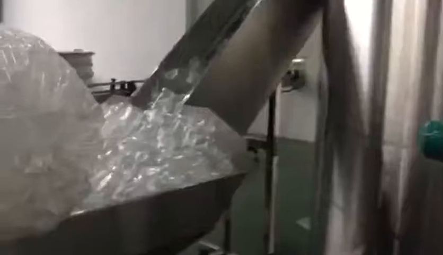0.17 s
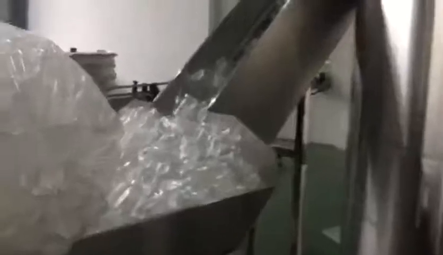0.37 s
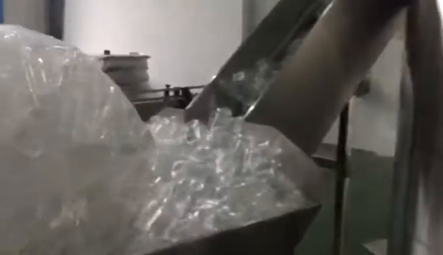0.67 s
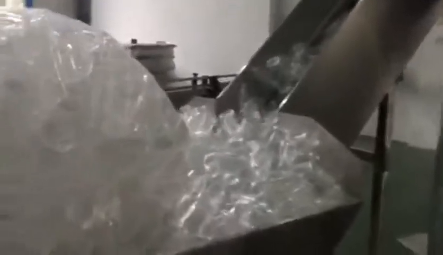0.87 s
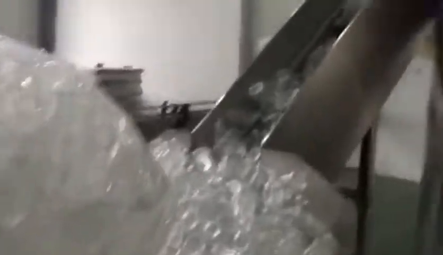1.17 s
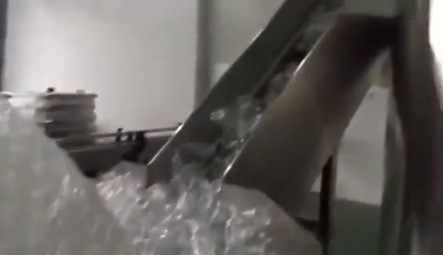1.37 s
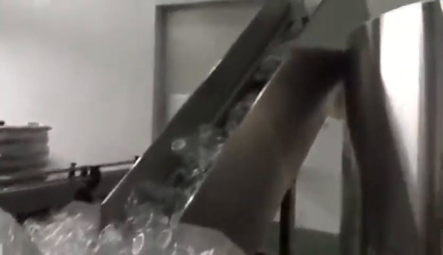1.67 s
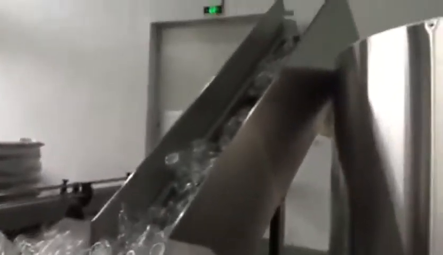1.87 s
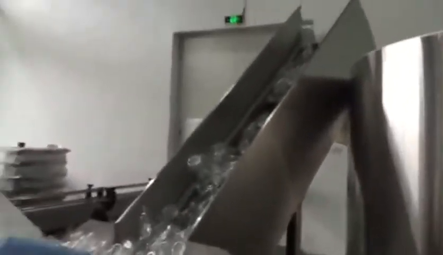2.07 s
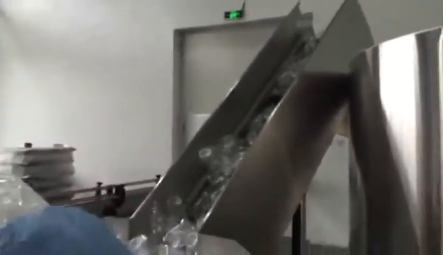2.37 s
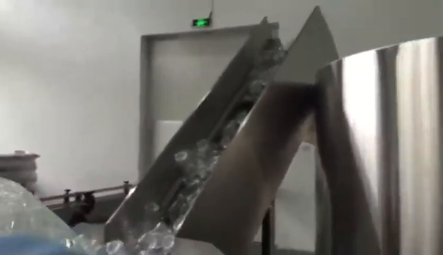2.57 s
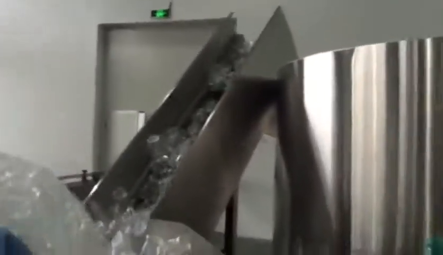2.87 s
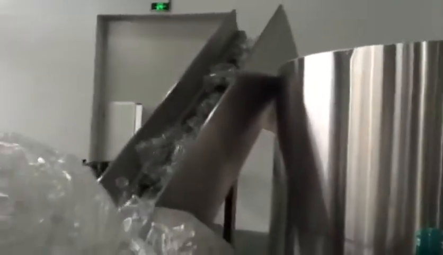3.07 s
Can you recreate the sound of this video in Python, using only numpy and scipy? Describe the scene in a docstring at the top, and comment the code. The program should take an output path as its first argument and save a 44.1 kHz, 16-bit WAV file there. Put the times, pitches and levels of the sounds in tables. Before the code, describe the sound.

Empty plastic bottles clatter into a steel drum from the start, clacking close by and thudding on its wall, over motor hum, rumble and compressed air hiss in a hard-walled factory room. From about 1 second the steel rings louder. Two soft bass bumps pass near 1.8 seconds, air rushes out briefly at 1.9 and 2.3, and the bottles keep tumbling until the end, just past 3 seconds.

```python
"""A bottle sorting machine in a hard-walled factory room, heard through one moving microphone.
The microphone opens at 0.1 s on the hum and rumble of the drive and the hiss of compressed air.
At once a conveyor is tipping empty plastic bottles into a steel drum: they clatter, clack close by
and boom on its wall. From about 1 s the steel rings louder. Two soft bass bumps pass near 1.8 s,
air rushes out at 1.9 and 2.3 s, and the bottles tumble on to the end."""
import sys
import numpy as np
from scipy import signal
from scipy.fft import rfft, irfft
from scipy.io import wavfile

SR = 44100
rng = np.random.default_rng(int(sys.argv[2]) if len(sys.argv) > 2 else 0)


def wrap_up_sound(samples):
    """Save the sound to the file named by the first command line argument, as 16-bit audio."""
    columns = np.atleast_2d(samples).T
    # keep every value between -1 and 1, then stretch to whole-number steps
    tamed = np.clip(columns, -1, 1)
    steps = np.round(tamed * 32767).astype(np.int16)
    wavfile.write(sys.argv[1], SR, steps)


N = 141561


def amp(db):
    """Decibels to gain."""
    return 10 ** (np.asarray(db) / 20)


def unit_rms(x):
    """Scales to rms 1."""
    return x / np.sqrt(np.mean(x ** 2) + 1e-20)


def unit_energy(x):
    """Scales to energy 1."""
    return x / (np.linalg.norm(x) + 1e-20)


def at_hz(points, hz):
    """Reads a spectrum on a log-frequency axis."""
    freq_hz, value = np.transpose(points)
    return np.interp(np.log(hz + 1), np.log(freq_hz + 1), value)


def level(points):
    """Gain per sample from rows of time_s, level_db."""
    return amp(np.interp(np.arange(N) / SR, *np.transpose(points)))


def add(mix, start_s, sound):
    """Mixes a sound in at a time."""
    part = mix[max(round(start_s * SR), 0):][:len(sound)]
    part += sound[:len(part)]


def through(x, response):
    """Convolves and cuts to length."""
    return signal.fftconvolve(x, response)[:N]


def colour(points, size=4096):
    """Minimum-phase response of energy 1 with the given spectral shape."""
    log_gain = np.log(amp(at_hz(points, abs(np.fft.fftfreq(size, 1 / SR)))))
    spectrum = np.exp(np.conj(signal.hilbert(log_gain)))
    return unit_energy(np.fft.ifft(spectrum).real[:size // 2])


def noise(points):
    """Noise of rms 1 with the given spectral shape."""
    return unit_rms(through(rng.standard_normal(N), colour(points)))


def drift(rate_hz):
    """Slow random motion of rms 1."""
    hz = np.fft.rfftfreq(N, 1 / SR)
    return unit_rms(irfft(rfft(rng.standard_normal(N)) / (1 + (hz / rate_hz) ** 2), N))


def impacts(per_s, spread_db):
    """Random clicks, many small and a few large."""
    size = amp(spread_db * np.minimum(rng.exponential(1, N), 4)) * rng.choice([-1, 1], N)
    return size * (rng.random(N) < per_s / SR)


def blows(rows, rise_s, decay_s):
    """Each blow is several bottles at once: a burst of contacts that swells and dies."""
    out, t = np.zeros(N), np.arange(SR // 8) / SR
    for start_s, db in rows:
        contacts = rng.standard_normal(len(t)) * (1 - np.exp(-t / rise_s)) * np.exp(-t / decay_s)
        add(out, start_s, amp(db) * np.sqrt(0.027 * SR) * unit_energy(contacts))  # energy of 27 ms at db
    return out


# reverberation of the hard walls around the microphone: freq_hz, t60_s
ROOM_DECAY = [(125, 0.89), (1000, 0.81), (4000, 0.42), (12000, 0.21)]

def room(direct, wet_db, spots=6):
    """Direct sound plus a diffuse tail whose treble dies first; echoes change as the microphone moves."""
    wet, position = np.zeros(N), np.linspace(0, spots - 1, N)
    for spot in range(spots):
        hz, t, spectra = signal.stft(rng.standard_normal(SR // 2), SR, nperseg=256)
        decay = amp(-60 * t / at_hz(ROOM_DECAY, hz)[:, None])
        tail = signal.istft(spectra * decay, SR)[1]
        tail[:SR // 250] = 0  # the first echo arrives after 4 ms
        crossfade = np.cos(np.pi / 2 * np.minimum(abs(position - spot), 1))
        wet += through(direct * crossfade, unit_energy(tail))
    return (direct + amp(wet_db) * wet) / np.hypot(1, amp(wet_db))


# the drive's rumble, under everything at the microphone: time_s, level_db
RUMBLE_LEVEL = [(.12, -23.5), (.9, -21), (1.4, -21.5), (2.5, -24), (3.21, -21)]
# colour of that rumble: freq_hz, density_db
RUMBLE_SPECTRUM = [(20, -14), (35, -48), (50, -9.5), (100, -4.5), (170, 0.5), (290, 0.5), (450, -5.5),
                   (700, -10), (1500, -15.5), (5000, -22.5)]
# tones of the drive: pitch_hz, level_db
HUM_TONES = [(220.7, -39.5), (245.5, -35.5), (693.5, -39), (1416, -45.5), (2123, -51), (3278, -43)]

def drive():
    """Motors and conveyor: a fluttering rumble and slightly wavering tones."""
    out = level(RUMBLE_LEVEL) * noise(RUMBLE_SPECTRUM) * amp(1.12 * drift(rate_hz=20))
    for hz, db in HUM_TONES:
        cycles = np.cumsum(hz * (1 + 0.00318 * drift(rate_hz=5.07))) / SR
        out += amp(db + 3.7 * drift(rate_hz=1.1)) * np.sqrt(2) * np.sin(2 * np.pi * cycles)
    return out


# the machine's compressed air, at the microphone: time_s, level_db
HISS_LEVEL = [(.12, -18.5), (.5, -21), (.64, -21.5), (.9, -24.5), (1.12, -22), (1.3, -22.5), (1.5, -21.5),
              (1.7, -23.5), (1.8, -21.5), (1.9, -23), (2.02, -20), (2.16, -22), (2.41, -23.5), (2.8, -24.5),
              (2.95, -24), (3.21, -23)]
# colour of escaping air: freq_hz, density_db
AIR_SPECTRUM = [(1000, -28), (3000, 7), (6500, 7), (7700, 2), (9700, 1), (10450, -6.5), (10900, -1.5),
                (11500, -5.5)]

def air_hiss():
    """Compressed air hisses and flutters."""
    return level(HISS_LEVEL) * amp(1.9 * drift(rate_hz=17)) * noise(AIR_SPECTRUM)


def flurries(per_s=22, decay_s=0.01):
    """Gain of the clatter: each falling bottle sets off a short flurry of taps."""
    gain, t = np.ones(N), np.arange(SR // 8) / SR
    for slot_s in np.arange(0, N / SR, 1 / per_s):
        add(gain, slot_s + rng.random() / per_s, np.exp(-t / decay_s))
    return gain


# bright clatter of the heap in the drum, with the room around it: time_s, level_db
CLATTER_LEVEL = [(0.12,-23), (0.18,-18.5), (.44,-18.5), (.56,-22), (0.72,-20.5), (0.78,-20), (0.93,-23.5),
                 (1.0,-20.5), (1.2,-20.5), (1.34,-20.5), (1.47,-24.5), (1.57,-19), (1.62,-25.5),
                 (1.86,-20.5), (2.06,-20), (2.17,-25.5), (2.3,-19.5), (2.54,-25.5), (2.66,-23.5),
                 (2.74,-33), (2.79,-20.5), (2.9,-26), (2.97,-22.5), (3.21,-21.5)]
# colour of the empty plastic bottles: freq_hz, density_db
PLASTIC_SPECTRUM = [(30, -31), (200, -11), (800, -4), (1550, -1), (2050, 3.5), (2850, 1), (4500, -0.5),
                    (4900, -8), (5500, -6.5), (6800, -18), (7700, -23), (11500, -25.5)]

def bottle_clatter(count=300, modes=24):
    """Thin plastic shells tap each other; each rings briefly with its own modes."""
    taps, t = np.zeros(N), np.arange(SR // 60) / SR
    mode_hz = rng.uniform(300, 12000, size=(count, modes, 1))
    t60_s = 0.022 * np.sqrt(3000 / mode_hz)
    shells = (np.cos(2 * np.pi * mode_hz * t) * amp(-60 * t / t60_s)).sum(1)
    clicks = impacts(per_s=1400, spread_db=3)
    struck = rng.integers(0, count, N)
    for i in np.flatnonzero(clicks):
        add(taps, i / SR, clicks[i] * shells[struck[i]])
    heap = unit_rms(through(taps * flurries(), colour(PLASTIC_SPECTRUM)))
    return room(heap, wet_db=-4) * level(CLATTER_LEVEL)


# bottles colliding close to the microphone: start_s, relative_db
CLOSE_CLACKS = [(.112, -19), (.21, -16.5), (.335, -19), (.408, -15.5), (.634, -18), (.755, -15.5),
                (.8, -18), (1.042, -18.5), (1.112, -19.5), (1.321, -14), (1.669, -19), (1.925, -18.5),
                (1.99, -20), (2.277, -20), (2.638, -19), (3.094, -21), (3.14, -23)]

def bottle_clacks(tilt_db_per_octave=0.5):
    """Nearby bottles clack sharply against each other, brighter than the heap."""
    bright = colour([(hz, db + tilt_db_per_octave * np.log2(hz)) for hz, db in PLASTIC_SPECTRUM])
    clacks = through(blows(CLOSE_CLACKS, rise_s=0.00031, decay_s=0.026), bright)
    return amp(-2.5) * room(clacks, wet_db=-4)


# dull tumbling inside the drum: time_s, relative_db
TUMBLE_LEVEL = [(.12, -22.5), (.35, -20.5), (.6, -21.5), (.88, -26), (1.09, -23.5), (1.16, -20),
                (1.36, -19.5), (1.55, -21.5), (1.69, -18), (1.75, -25), (2.0, -21.5), (2.28, -21),
                (2.36, -18.5), (2.6, -18.5), (2.76, -20), (2.89, -22.5), (3.02, -23.5), (3.21, -18.5)]
# bottles landing on the drum wall: start_s, relative_db
LANDINGS = [(.115, -15.5), (.309, -18), (.941, -22), (1.112, -12.5), (1.2, -18.5), (1.31, -17.5),
            (1.668, -16), (1.783, -17.5), (1.945, -17.5), (2.326, -13.5), (2.377, -22), (2.545, -16.5),
            (2.87, -16)]
# colour of a bottle's thud on that wall: freq_hz, density_db
THUD_SPECTRUM = [(30, -33), (70, -26), (130, -13), (290, 1.5), (400, -6), (470, -4.5), (540, -0.5),
                 (780, -2.5), (1000, -0.5), (1130, -6), (1320, -3.5), (1500, -12.5), (2000, -12.5),
                 (4000, -23)]
# the wall ringing under rolling bottles, at the microphone: time_s, level_db
RING_LEVEL = [(.12, -33), (.9, -32), (1.25, -23.5), (1.8, -21.5), (2.0, -19), (2.2, -22), (2.38, -17.5),
              (2.6, -20.5), (3.21, -28.5)]
# modes of the steel wall: pitch_hz, relative_db, t60_s
WALL_MODES = [(140, -7, 0.26), (166.3, -1, 0.2), (220, -0.5, 0.36), (242.5, -5, 0.25), (286, -0.5, 0.12),
              (425.4, -1.5, 0.28), (536.7, 1, 0.2), (576.3, 0, 0.25), (607.7, -4.5, 0.48), (690, 0, 0.4),
              (724, -2.5, 0.51), (748, -9, 0.83), (807, -5, 0.32), (903, -8, 0.1), (1330, -4, .2)]

def steel_drum():
    """Bottles tumble and land in the drum: dull thuds carry into the room, and the wall rings."""
    t = np.arange(SR) / SR
    ring = sum(amp(db) * unit_energy(amp(-60 * t / t60_s) * np.cos(2 * np.pi * hz * t))
               for hz, db, t60_s in WALL_MODES)
    tumbling = amp(-1) * level(TUMBLE_LEVEL) * unit_rms(impacts(per_s=420, spread_db=2.5))
    landing = amp(-2.5) * blows(LANDINGS, rise_s=0.0055, decay_s=0.021)
    thuds = room(through(tumbling + landing, colour(THUD_SPECTRUM)), wet_db=-6)
    rolling = level(RING_LEVEL) * unit_rms(impacts(per_s=700, spread_db=1.5))
    return thuds + through(rolling + amp(-5.5) * landing, unit_energy(ring))


# single bottles striking spots on the drum wall: start_s, favoured_hz, relative_db
WALL_KNOCKS = [(.115, 721, -21), (1.114, 910, -16), (1.925, 820, -16), (1.95, 612, -20), (2.05, 612, -19.5),
               (2.18, 612, -16), (2.34, 612, -17.5), (2.43, 721, -17), (2.47, 577, -16), (2.6, 533, -17),
               (2.85, 748, -16.5)]

def wall_knocks(rise_s=0.0032, width_hz=21):
    """The modes that a struck spot favours ring on, unevenly as other bottles brush past."""
    out, t = np.zeros(N), np.arange(SR) / SR
    for start_s, favoured_hz, db in WALL_KNOCKS:
        ring = np.zeros(len(t))
        for hz, _, t60_s in WALL_MODES:
            coupling = 1 / (1 + ((hz - favoured_hz) / width_hz) ** 2)
            ring += coupling * amp(-60 * t / t60_s) * np.sin(2 * np.pi * (hz * t + rng.random()))
        add(out, start_s, amp(db) * (1 - np.exp(-t / rise_s)) * ring)
    return out * amp(2.8 * drift(rate_hz=40))


# deep soft bumps at the microphone: start_s, level_db
BASS_BUMPS = [(1.76, -31), (1.819, -28)]

def bass_bumps(pitch_hz=66, peak_s=0.012):
    """A few cycles of deep bass that swell and die."""
    out, t = np.zeros(N), np.arange(SR // 4) / SR
    swell = t / peak_s * np.exp(1 - t / peak_s)
    for start_s, db in BASS_BUMPS:
        add(out, start_s, amp(db) * swell * np.sin(2 * np.pi * pitch_hz * t))
    return out


# bright rushes of air from the machine: start_s, level_db, decay_s
AIR_RUSHES = [(1.924, -17.5, 0.074), (2.317, -18, 0.024)]

def air_rushes(attack_s=0.0021):
    """Compressed air rushes out suddenly and dies back under the hiss."""
    flow = np.zeros(N)
    for start_s, db, decay_s in AIR_RUSHES:
        age_s = np.maximum(np.arange(N) / SR - start_s, 0)
        rush = amp(db) * np.minimum(age_s / attack_s, 1) * np.exp(-age_s / decay_s)
        flow = np.hypot(flow, rush)  # noise adds in power
    return flow * noise(AIR_SPECTRUM)


def scene():
    """The whole machine at one microphone, alike in both channels."""
    mono = (drive() + air_hiss() + bottle_clatter() + bottle_clacks()
            + steel_drum() + wall_knocks() + bass_bumps() + air_rushes())
    return np.tile(mono, (2, 1))


def record(dry, open_s=0.1055, fade_s=0.0027, ceiling=0.9, cutoff_hz=11750):
    """The microphone opens after a moment; peaks are rounded off and the top treble is cut steeply."""
    opened = dry * np.clip((np.arange(N) / SR - open_s) / fade_s, 0, 1)
    rounded = opened / (1 + (opened / ceiling) ** 8) ** (1 / 8)
    low_pass = signal.firwin(201, cutoff_hz, window=("kaiser", 7), fs=SR)
    return signal.oaconvolve(rounded, low_pass[None], "same")


dry = scene()
out = record(dry)
wrap_up_sound(out)
```